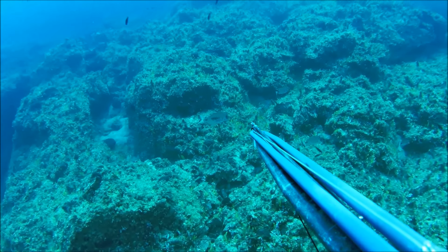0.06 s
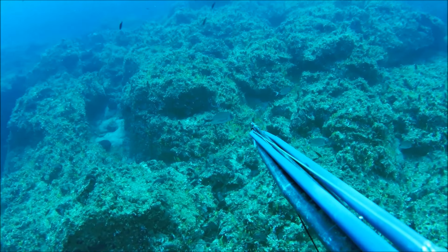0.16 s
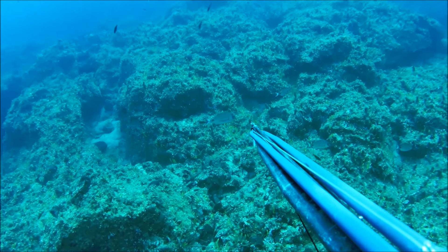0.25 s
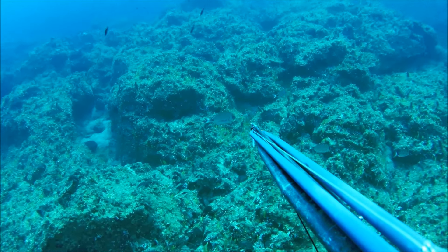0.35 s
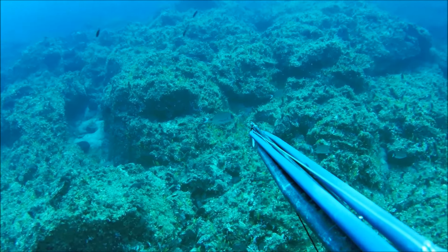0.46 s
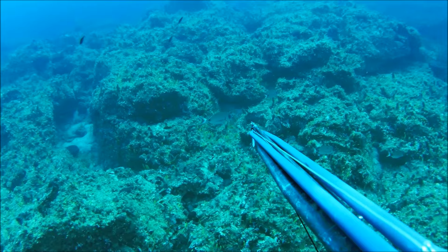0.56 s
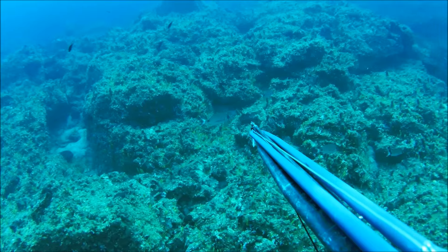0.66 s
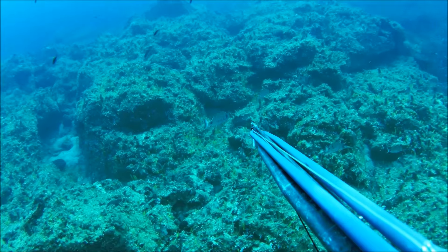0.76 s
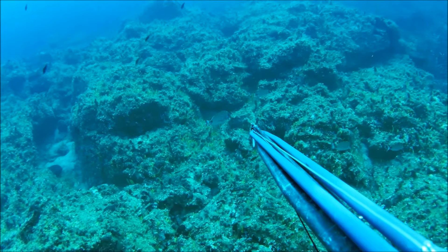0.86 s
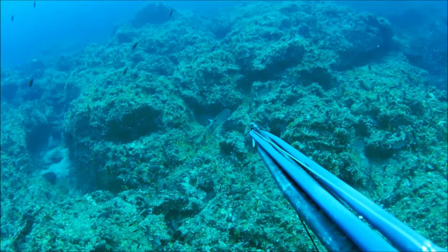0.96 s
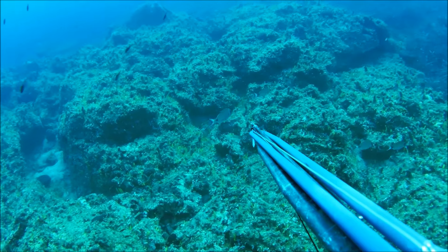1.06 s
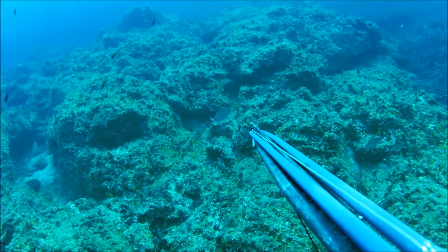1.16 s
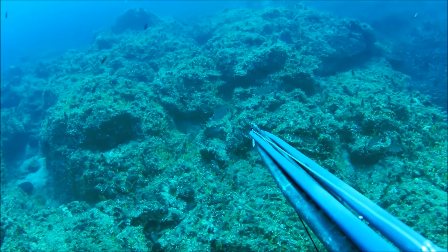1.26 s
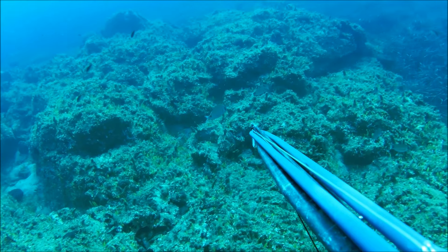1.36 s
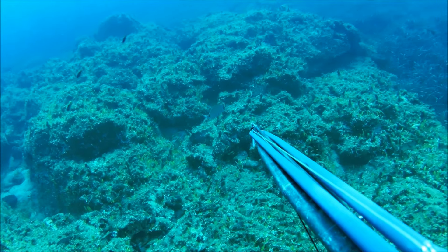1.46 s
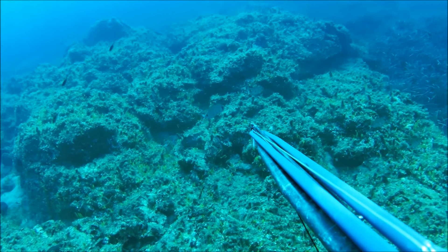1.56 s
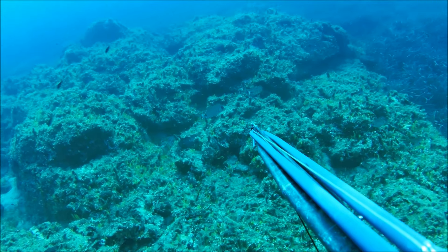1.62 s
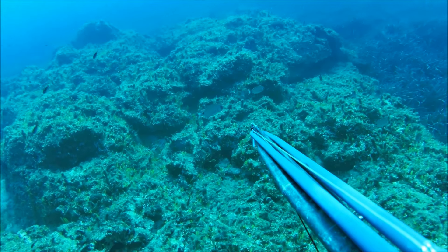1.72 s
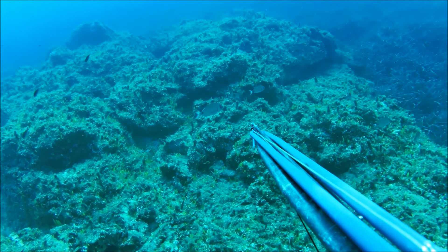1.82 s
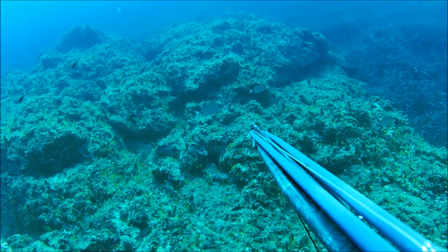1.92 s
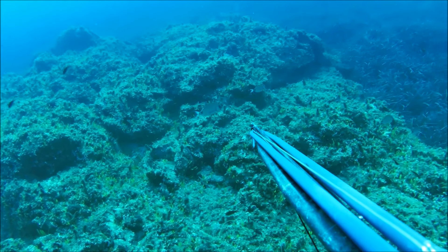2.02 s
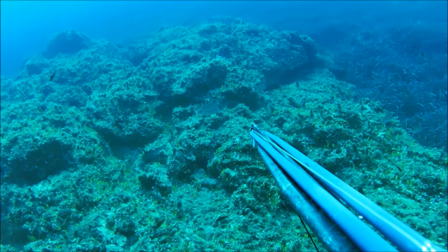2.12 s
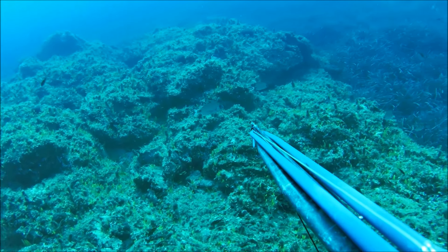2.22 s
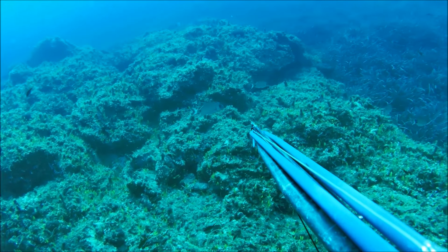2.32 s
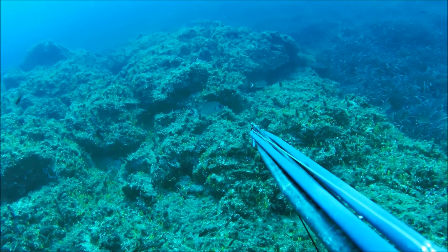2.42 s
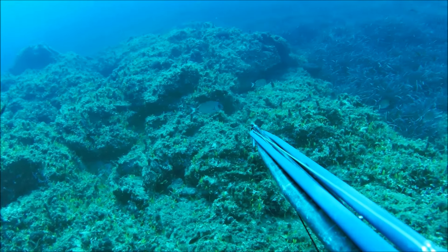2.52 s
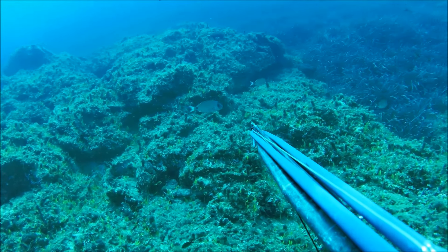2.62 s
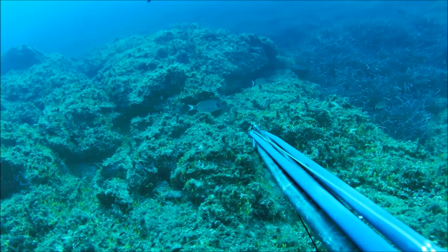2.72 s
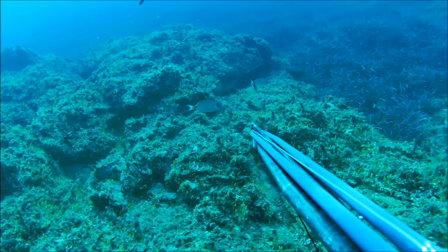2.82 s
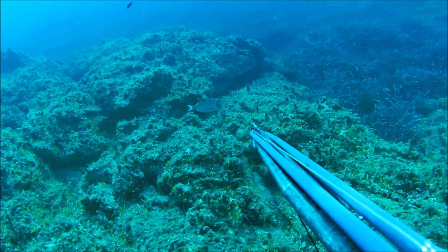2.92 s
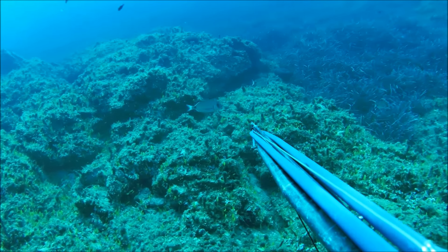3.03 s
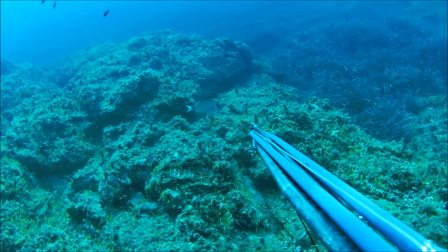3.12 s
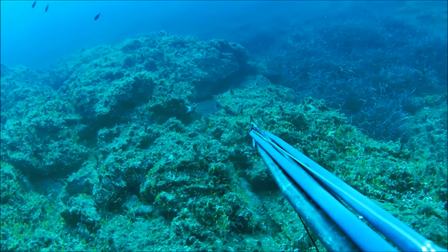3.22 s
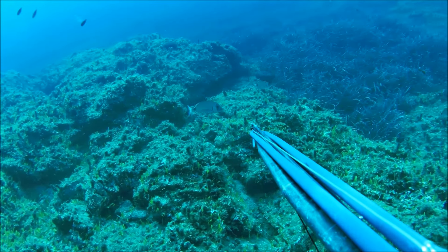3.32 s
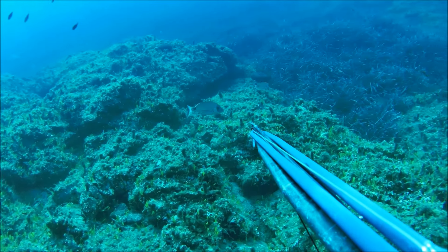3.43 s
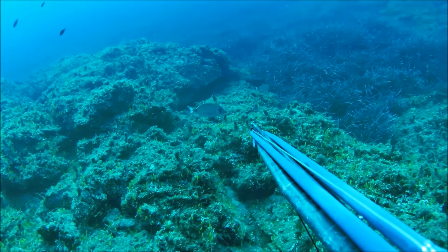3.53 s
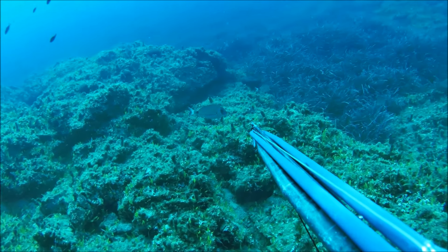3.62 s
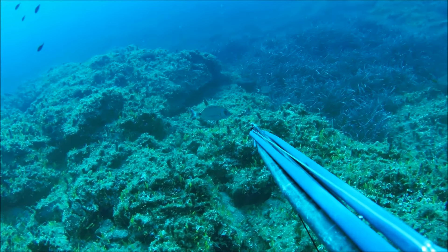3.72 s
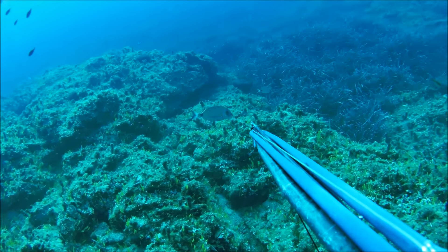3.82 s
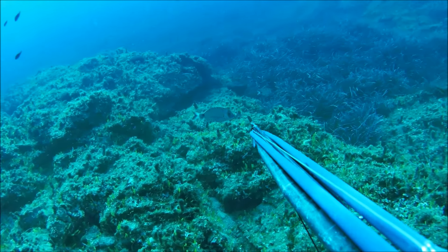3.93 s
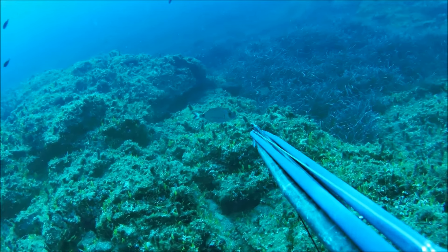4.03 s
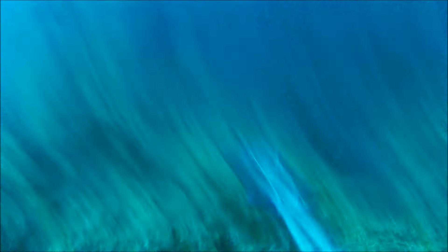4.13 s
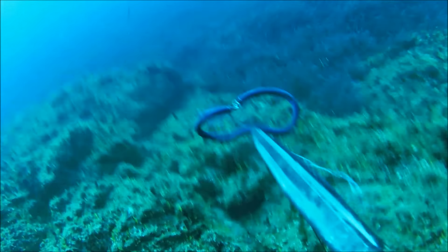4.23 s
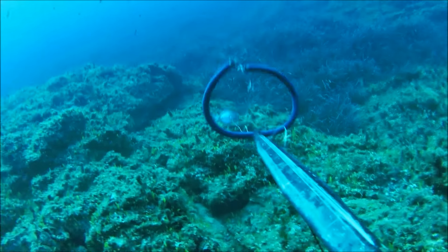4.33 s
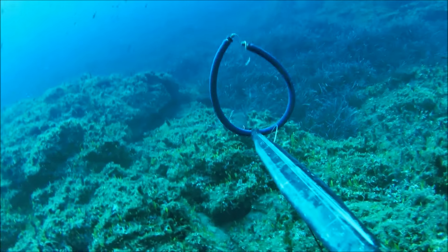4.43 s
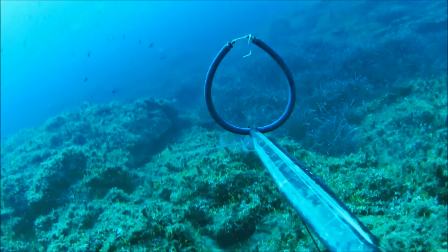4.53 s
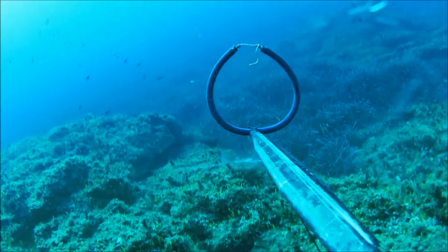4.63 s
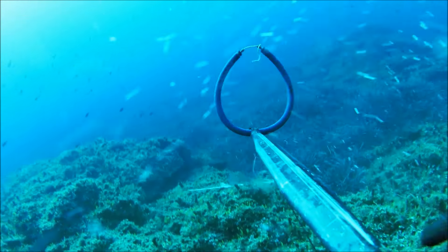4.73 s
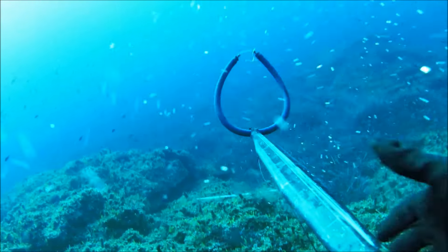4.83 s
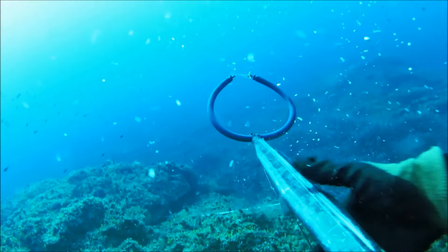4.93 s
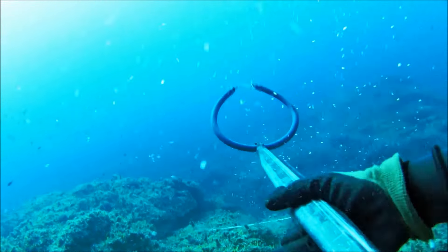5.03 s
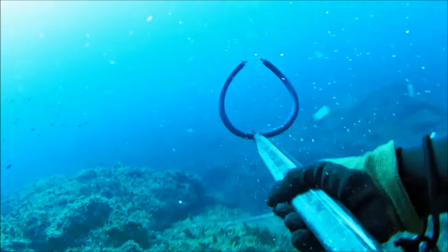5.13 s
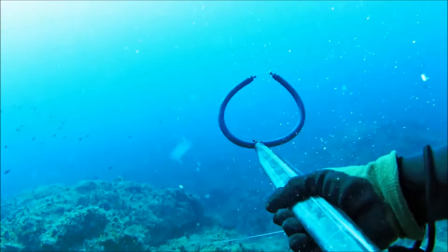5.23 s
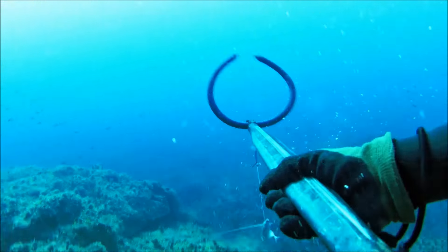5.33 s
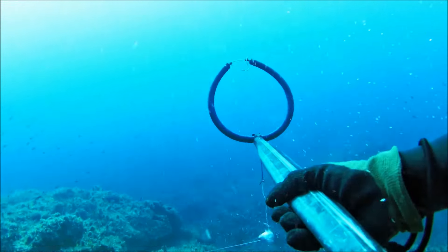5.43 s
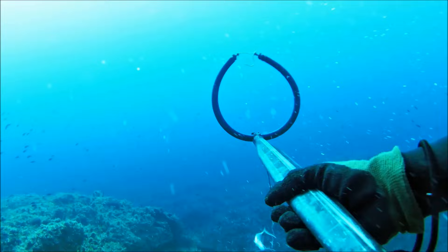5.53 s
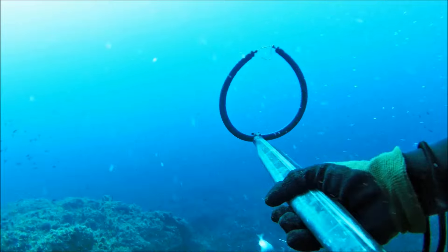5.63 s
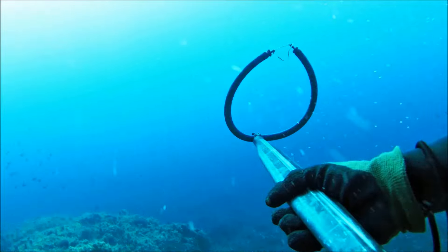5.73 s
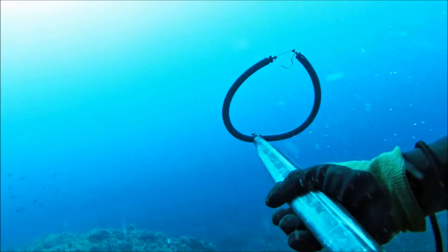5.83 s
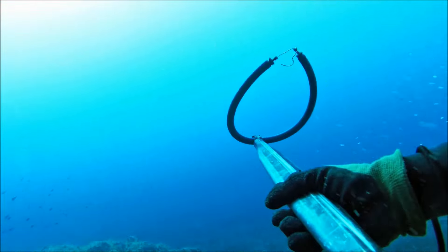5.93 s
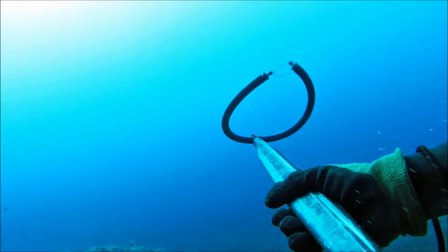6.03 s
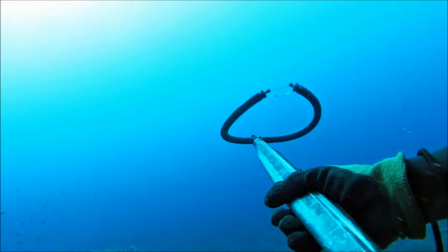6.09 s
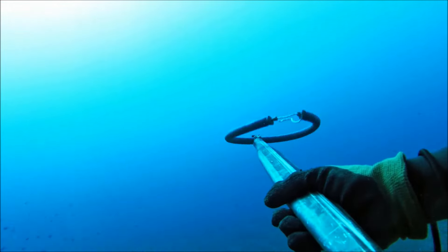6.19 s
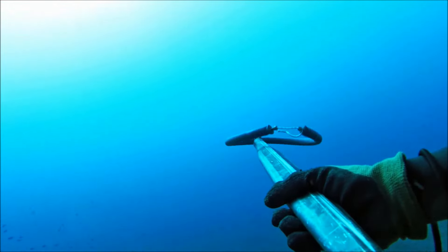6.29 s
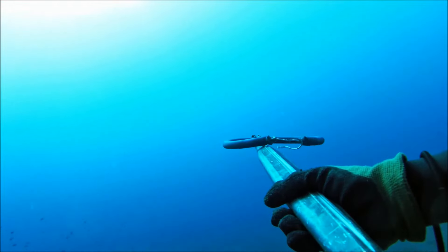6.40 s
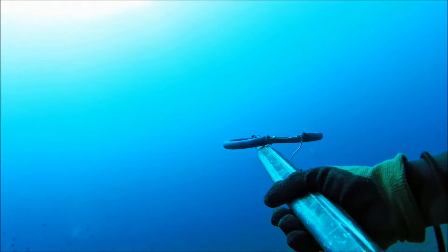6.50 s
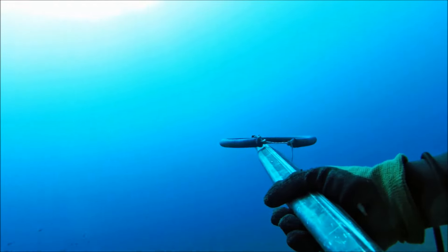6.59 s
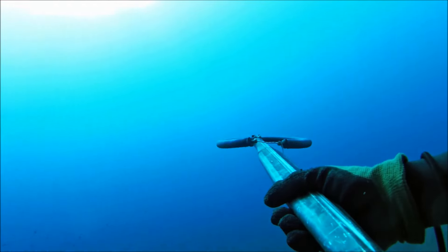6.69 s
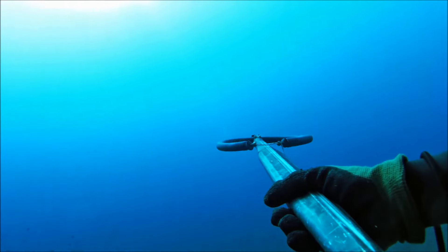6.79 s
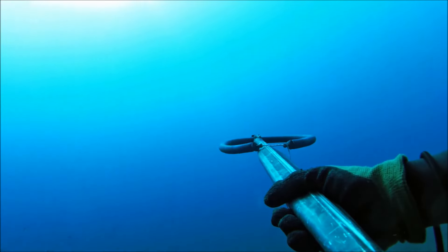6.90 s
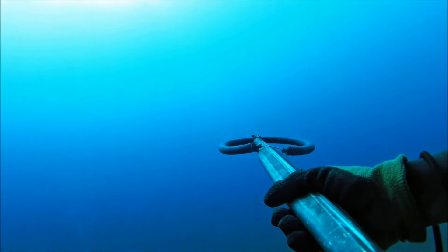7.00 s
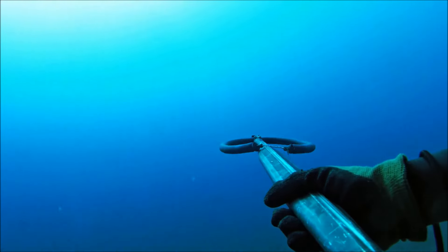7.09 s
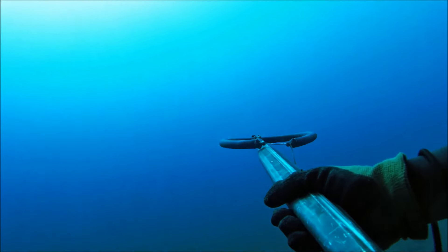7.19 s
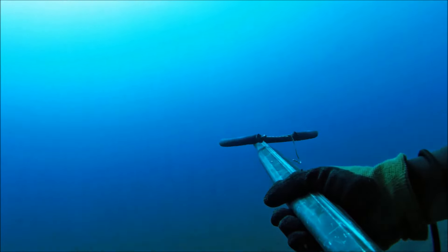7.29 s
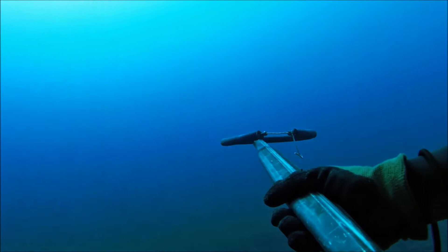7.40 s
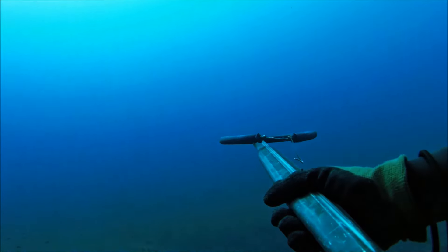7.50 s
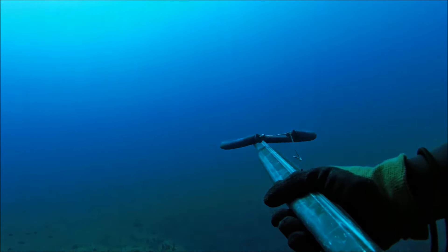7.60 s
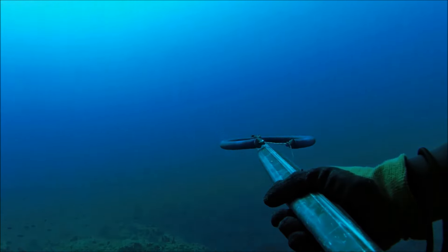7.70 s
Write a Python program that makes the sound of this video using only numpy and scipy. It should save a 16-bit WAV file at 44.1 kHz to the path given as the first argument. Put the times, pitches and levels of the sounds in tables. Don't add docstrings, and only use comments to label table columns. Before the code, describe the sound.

Under the sea, faint crackling calm is shattered by an overloaded speargun blast; handling knocks and line scrapes follow, then settle back to hiss.

```python
import sys
import numpy as np
from scipy import signal
from scipy.fft import rfft, irfft
from scipy.io import wavfile

SR = 44100
rng = np.random.default_rng(int(sys.argv[2]) if len(sys.argv) > 2 else 0)


def to_linear_factor(level_db):
    exponent = np.asarray(level_db, float) / 20
    return 10 ** exponent


def master_out(mix):
    frames = np.transpose(np.atleast_2d(mix))
    ceiling = np.clip(frames, -1, 1)
    pcm = np.round(ceiling * 32767).astype(np.int16)
    wavfile.write(sys.argv[1], SR, pcm)


N = 341775
TIME_S = np.arange(N) / SR
LOOSE_S = 4.44

# f/Hz, width/Hz, level/dB
HOUSING_MODES = [(43, 25, 2.5), (73.6, 20, -2), (160.8, 10, -1), (200, 99, -1), (260, 20.2, 5.5),
                 (315.6, 41.5, 1), (433, 78, -1), (489.6, 49, -1.5), (807.6, 95, -1.5), (1022.5, 167, -1),
                 (1175, 86, -7), (1550, 88, -12), (2040, 890, -17), (2256, 140, -12.5), (4700, 570, -31)]
# f/Hz, density/dB per Hz
LEAK = [(20, -43), (100, -14.5), (400, -26.5), (620, -32.5), (1400, -30), (3000, -29.5), (5500, -33.5),
        (8000, -38.5), (11000, -69.5), (16000, -75)]
# t/s, level/dB
SEA_LEVEL = [
    (0.0, -44.5),
    (4.3, -45),
    (4.46, -57),
    (4.6, -52),
    (4.7, -42),
    (5.5, -47),
    (5.62, -49.5),
    (5.74, -46.5),
    (7.75, -47),
]
# f/Hz, level/dB
CAMERA_HUM = [(299, -57), (441, -59), (500, -66.5), (567, -66.5), (1200, -65.5), (1776, -90.5)]
# t/s, peak/dB
SHRIMP_SNAPS = [(0.1889, -47), (0.848, -46), (1.056, -47), (1.251, -37), (1.4162, -48), (1.7943, -47),
                (1.848, -39.5), (1.878, -41), (2.1566, -35.5), (2.209, -44), (2.539, -41), (2.602, -44),
                (2.78, -41.5), (2.855, -45), (2.9057, -43), (3.174, -40), (3.29, -38), (3.4185, -42),
                (3.99, -42), (6.4404, -45), (6.6484, -41), (6.998, -21.5), (7.595, -29), (7.74, -44)]
# t/s, peak/dB, f/Hz, rise/s, hold/s, t60/s
SLOW_HEAVES = [
    (0.2, -49, 48, .15, 0, .8),
    (3.97, -40, 50, .15, 0, .6),
    (4.66, -31, 45, .05, .06, .4),
    (6.9, -33, 48, .05, .04, .4),
    (5.6008, -7.5, 185, .0015, .004, .06),
    (5.408, -17, 186, .02, .04, .12),
    (5.263, -6, 225, .002, 0, .09),
    (5.8, -33, 185, .04, .06, .2),
    (7.36, -33, 185, .04, .05, .2),
]
# t/s, peak/dB
LID_RAPS = [(0.474, -32), (0.495, -27), (0.508, -26), (0.528, -35), (0.544, -37), (4.244, -27.5),
            (4.263, -22), (4.486, -24), (4.874, -20.5), (4.892, -28), (4.947, -8), (4.958, -24),
            (4.983, -19.5), (5.009, -24), (5.036, -19.5), (5.139, -20), (5.198, -8), (5.293, -21.5),
            (5.424, -25.5), (5.677, -29), (5.716, -22.5), (5.793, -30), (5.853, -22.5), (5.889, -35),
            (6.127, -20.5), (6.147, -13), (6.225, -15), (6.582, -27.5), (6.734, -34.5), (7.185, -36.5)]
# t/s, peak/dB, brightness/dB
LID_CLACKS = [(0.239, -34, -30), (0.263, -33.5, -38), (4.457, -10, -16), (4.536, -13.5, -37),
              (4.59, -30, -9), (4.707, -17, -5.5), (4.737, -19, -26), (4.849, -16, -3.5), (4.923, -35, 0.5),
              (5.075, -21.5, -7), (5.162, -15.5, -24), (5.217, 3, -9), (5.237, -11, -14), (5.259, -4.5, 0),
              (5.352, -18.5, -34), (5.372, -16, -37), (5.395, -10.5, -22), (5.479, -29, -2),
              (5.594, -13, -10), (5.647, -22, -24), (6.238, -13, -18), (7.052, -27.5, -31)]
# t/s, peak/dB, f/Hz
MOUNT_SWINGS = [(0.259, -42, 433), (0.507, -22, 168.3), (0.547, -27, 166.4), (0.591, -33.5, 164),
                (0.785, -34.5, 262), (3.93, -44, 52), (4.259, -17, 293), (4.52, -32, 282),
                (4.903, -19, 250), (4.965, -12.5, 274.6), (4.993, -15, 349), (5.367, -22, 300),
                (5.47, -23.5, 187.5), (5.638, -20.5, 309.5), (5.711, -25, 301), (5.869, -31, 340),
                (6.108, -16.5, 177), (6.128, -19, 187), (6.588, -16.5, 334.5), (6.821, -45, 241)]
# t/s, peak/dB, f/Hz
SWIVEL_TAPS = [(.499, -22, 990), (0.509, -22, 1015), (0.53, -34, 1010), (.546, -34, 950),
               (1.068, -49, 4500), (1.263, -42, 4700), (1.54, -52, 4800), (1.66, -51, 4620),
               (1.786, -54, 4400), (4.018, -49, 4500), (4.246, -28, 400), (4.885, -41, 2000),
               (4.919, -40.5, 2400), (4.964, -30, 2100), (5.009, -46, 2000), (5.038, -46, 2100),
               (5.051, -41, 2100), (5.064, -46, 2000), (5.136, -42, 1510), (5.165, -42.5, 1500),
               (5.198, -25, 2030), (5.208, -40, 2200), (5.229, -32, 1900), (5.335, -45, 2000),
               (5.464, -36, 1500), (5.474, -41, 2100), (5.484, -34, 2040), (5.494, -37, 1500),
               (5.94, -45, 2250), (5.97, -55, 3100), (6.053, -43, 2300), (6.065, -45, 2290),
               (6.165, -40, 2030), (6.22, -51, 3200), (6.24, -25.5, 2250), (6.261, -53, 4700),
               (7.021, -56, 5200), (7.042, -47, 2300)]
# t/s, peak/dB, f/Hz, rise/s, t60/s
WATER_PUSHES = [
    (0.501, -39.5, 79.3, 0.027, 0.5),
    (2.05, -38, 147, 0.011, 0.12),
    (4.301, -4, 61.9, 0.028, 0.45),
]
# t/s, peak/dB, f/Hz
GLOVE_BUMPS = [(0.791, -34, 256), (5.396, -29, 260), (5.47, -24, 185), (5.62, -26, 190), (5.941, -43, 190),
               (6.086, -16, 232), (6.759, -24, 226), (6.87, -27, 74.6), (6.969, -49, 230),
               (7.049, -36, 292), (7.31, -27.5, 70), (7.335, -30, 191), (7.459, -42, 70)]
# t/s, peak/dB, f/Hz
GRIP_THUMPS = [(2.056, -23, 251), (3.03, -45, 250), (4.446, -24, 73.4), (4.683, -33, 277),
               (4.947, -3.5, 307.6), (5.056, -13.5, 260), (5.199, -5, 328), (5.215, -5, 294),
               (5.247, 4.5, 269), (5.277, -9.5, 188), (5.312, -14.5, 298), (5.352, -11.5, 220),
               (5.625, -25, 200), (5.676, -30.5, 295), (6.043, -20, 65.6), (6.377, -34, 260),
               (6.598, -11, 128.4), (6.617, -12, 78), (6.693, -28.5, 138), (6.738, -27.5, 360),
               (6.816, -23, 67), (7.094, -23.5, 105), (7.172, -28.5, 53.5), (7.236, -20.5, 259),
               (7.578, -38, 436)]
# t/s, peak/dB, f/Hz, shaking/s
NOTCH_CHATTER = [
    (4.286, -24, 950, 0.0066),
    (4.437, -13.5, 1033, 0.0067),
    (4.523, -23, 950, 0.0018),
    (4.957, -11, 991, 0.0097),
    (5.145, -28, 970, 0.0027),
    (5.233, -15, 1020, 0.0091),
    (5.424, -23.5, 1000, .004),
    (6.146, -16.5, 940, 0.0057),
    (6.158, -20.5, 892, 0.01),
    (6.218, -22, 1012, 0.017),
]
# t/s, peak/dB, f/Hz
LINE_FLICKS = [(4.498, -47, 4600), (4.523, -47, 2200), (4.589, -51, 3600), (4.595, -50, 3400),
               (4.657, -51, 4600), (4.292, -30, 2100), (4.947, -36, 2300), (4.953, -35, 2300),
               (5.253, -27, 3200), (5.338, -52, 3000), (5.396, -47, 2400), (5.458, -46, 3000),
               (5.5375, -32, 7000), (5.597, -35, 6500), (5.679, -34, 900), (6.055, -51, 3200),
               (6.178, -47, 3400), (6.191, -46, 4300), (6.26, -46, 3030), (6.998, -32, 2420),
               (7.596, -28, 2600)]
# t/s, level/dB, f/Hz, shaking/s
SHAFT_RATTLES = [(4.293, -17, 870, .002), (4.297, 7, 1047, .004), (4.3035, 10, 830, .003),
                 (4.3105, 4, 1050, .005), (4.3215, 7, 850, .008), (4.335, 6, 1000, .003),
                 (4.341, 7, 900, .005), (4.359, -5, 850, .004), (4.4, 7, 1030, .0035),
                 (4.408, 4, 950, .004), (4.421, 2, 910, .003), (4.428, -16, 900, .004),
                 (4.432, -20, 1000, .003), (5.534, -6.5, 930, .005), (5.543, -13, 1015, .004),
                 (5.553, -13, 950, .004)]
# t/s, level/dB, f/Hz, shaking/s
BAND_WHIPS = [
    (4.3025, 7, 130, .006),
    (4.3135, 3, 260, .003),
    (4.3185, 6, 150, .013),
    (4.339, 6, 338, .006),
    (4.349, 12, 325, .008),
    (4.364, 2, 230, .002),
    (4.3705, 11, 275, .021),
    (4.392, 10, 190, .006),
    (4.413, 0.5, 323, .0013),
]
# t/s, peak/dB, centre/Hz, rise/s, t60/s
LINE_DRAGS = [
    (4.428, -28, 2600, 0.01, 0.012),
    (4.833, -29, 3570, 0.0182, 0.044),
    (5.532, -17, 2440, 0.0093, 0.046),
    (5.569, -37, 2920, .014, 0.028),
]
# start/s, length/s, force/dB, reach to lid/dB
RUB_STROKES = [(4.439, 0.075, -22.5, -14), (4.617, 0.029, -40, -2.5), (4.741, 0.076, -35.5, -4),
               (4.944, 0.021, -15, -12), (5.039, 0.18, -31.5, -8.5), (5.245, 0.019, -18.5, -2.5),
               (5.342, 0.09, -20.5, -16.5), (5.478, 0.086, -19, -6.5), (5.642, 0.033, -31.5, -11.5),
               (5.795, 0.089, -31.5, -0.5), (5.931, 0.014, -36, -1.5), (5.984, 0.051, -31.5, -8),
               (6.076, 0.055, -18.5, -14), (6.143, 0.078, -22, -3.5), (6.199, 0.041, -18.5, -8),
               (6.602, 0.057, -50, 6), (6.78, .05, -58, 7), (7.059, 0.03, -43, -10),
               (7.3, 0.13, -37.5, -10)]
# t/s, grip/dB
GLOVE_GRIP = [
    (6.252, 0),
    (6.27, -14),
    (6.3, -8),
    (6.36, 0),
]
# t/s, level/dB
WATER_SURGES = [(4.44, -17), (4.55, -33), (4.66, -34), (4.8, -38), (4.911, -29.5), (5.02, -24.5),
                (5.13, -27.5), (5.26, -16), (5.41, -24), (5.55, -22), (5.69, -36), (5.84, -32.5),
                (6.06, -29), (6.18, -26), (6.641, -22), (6.8, -25.5), (6.96, -47), (7.15, -31.5),
                (7.43, -31.5)]
# t/s, length/s, level/dB
LINE_SCRAPES = [(4.444, 0.0088, -78), (4.699, 0.03, -59), (4.823, .03, -61), (4.937, 0.025, -67.5),
                (5.23, 0.027, -57.5), (5.47, .02, -62.5), (5.535, 0.015, -65), (5.807, 0.016, -56.5),
                (6.045, 0.026, -66), (6.168, 0.063, -59.5), (6.917, .02, -70), (7.22, .02, -72),
                (7.352, .02, -73), (7.7, 0.036, -77)]
# t/s, peak/dB, housing knock re peak/dB
LINE_TICKS = [(4.4573, -47, 0), (4.55, -44.5, -4), (4.7073, -18.5, -17), (4.761, -48, 4),
              (4.8484, -21.5, 2), (4.865, -34, -5), (4.947, -48.5, 17.5), (4.956, -51, 12.5),
              (5.43, -41, -9), (5.491, -38, 3), (5.792, -37.5, 2), (6.2402, -28, -13)]
# t/s, peak/dB, f/Hz
BUBBLE_FIZZ = [
    (4.462, -50, 4400),
    (4.9, -44, 2110),
    (5.029, -49, 2000),
    (5.13, -52, 2390),
    (5.27, -49, 1980),
    (5.46, -38, 2000),
    (6.14, -55, 4480),
    (6.18, -55, 4500),
    (6.17, -55, 3250),
]
# t/s, peak/dB, f/Hz
HAND_KNOCKS = [
    (4.482, -9, 315),
    (4.511, -7.5, 285),
    (4.534, -15, 230),
    (4.732, -19.5, 270),
    (4.891, -8, 187),
    (5.348, -2.5, 224),
    (5.37, -10, 285),
    (5.592, 2, 206.7),
    (5.678, -23.5, 399),
]
# t/s, peak/dB, f/Hz
MOUNT_ROCKS = [
    (5.045, -6, 299),
    (6.071, -16, 226),
    (6.764, -18, 200),
    (7.35, -23, 199.5),
    (7.39, -21, 250),
]
# t/s, level/dB, f/Hz, shaking/s
BUTT_SLAM = [
    (5.5085, 10, 283, .022),
    (5.5152, 7, 1100, .0003),
]
# t/s, level/dB, f/Hz, t60/s
SHAFT_CLINKS = [
    (5.733, -54, 4250, .08),
    (5.794, -43, 4240, .15),
    (5.79, -50, 2300, .08),
    (5.79, -56, 3050, .08),
]


def evened(x):
    return x / np.sqrt(np.mean(x ** 2) + 1e-20)


def peaked(x):
    return x / abs(x).max()


def add(mix, start_s, sound):
    part = mix[round(start_s * SR):][:len(sound)]
    part += sound[:len(part)]


def band(x, lo_hz, hi_hz):
    return signal.sosfilt(signal.butter(2, [lo_hz, hi_hz], "band", fs=SR, output="sos"), x)


def envelope(rise_s, hold_s, t60_s):
    t = np.arange(round((rise_s + hold_s + t60_s) * SR)) / SR
    attack = np.sin(np.pi / 2 * np.clip(t / rise_s, 0, 1)) ** 2
    return t, attack * to_linear_factor(-60 * np.maximum(t - rise_s - hold_s, 0) / t60_s)


def push(rise_s, t60_s):
    shape = envelope(rise_s, 0, t60_s)[1][:4000]
    return rng.standard_normal(4000) * np.pad(shape, (0, 4000 - len(shape)))


def puff(hz, width, rise_s, t60_s):
    edges_hz = hz / width, min(hz * width, SR / 2.2)
    return peaked(band(band(push(rise_s, t60_s), *edges_hz), *edges_hz))


def ring(hz, rise_s, hold_s, t60_s, wobble=0.0055, pair_db=-7, jitter=0.):
    t, shape = envelope(rise_s, hold_s, t60_s)
    chance, stumble = rng.random(), rng.standard_normal(400)
    turns = hz * t * (1 + wobble * np.exp(-t / 0.0072))
    turns = turns + jitter * np.interp(turns, np.arange(len(stumble)), stumble - stumble[0])
    neighbour = to_linear_factor(pair_db) * np.sin(2 * np.pi * turns * (0.716 + 0.587 * chance))
    return -shape * (neighbour + np.sin(2 * np.pi * turns))


def grains(per_s, spread_db):
    size = to_linear_factor(spread_db * np.minimum(rng.exponential(1, N), 5)) * rng.choice([-1., 1.], N)
    return evened(size * (rng.random(N) < per_s / SR))


def lumps(per_s, depth_db):
    knots = rng.standard_normal(2000)
    return to_linear_factor(depth_db * np.interp(TIME_S * per_s, np.arange(len(knots)), knots))


def swell(start_s, length_s, db, rise_db_per_s, fall_db_per_s, rest_db):
    start_s, length_s, db = (np.reshape(v, (-1, 1)) for v in (start_s, length_s, db))
    t = TIME_S[::64]
    climb_db = rise_db_per_s * np.maximum(start_s - t, 0)
    fall_db = fall_db_per_s * np.maximum(t - start_s - length_s, 0)
    strokes_db = (db - climb_db - fall_db).max(axis=0)
    fade_in = np.clip((TIME_S - LOOSE_S) / 0.033 + 1, 0, 1)
    return fade_in * to_linear_factor(np.interp(TIME_S, t, np.maximum(strokes_db, rest_db)))


def housing(x, lo_hz, hi_hz):
    out = np.zeros(len(x))
    for k, (hz, width_hz, db) in enumerate(HOUSING_MODES):
        if lo_hz < hz < hi_hz:
            out += (-1) ** k * to_linear_factor(db) * signal.lfilter(*signal.iirpeak(hz, hz / width_hz, SR), x)
    return out


def snaps(events, rise_s, t60_s, lag_s):
    mix = np.zeros(N)
    for s, db, hz, knock_db in events:
        snap = puff(hz, 1.62, rise_s, t60_s)
        knock = puff(2240, 1.34, rise_s, 3 * t60_s)
        add(mix, s + lag_s, to_linear_factor(db) * (snap + to_linear_factor(knock_db) * knock))
    return mix


def thumps(events):
    mix = np.zeros(N)
    for s, db, hz, rise_s, t60_s in events:
        mount = peaked(band(housing(push(rise_s, t60_s), 100, 600), 60, 320))
        add(mix, s, to_linear_factor(db) * ring(hz, rise_s, 0, t60_s, wobble=0.13, jitter=0.0064))
        add(mix, s, to_linear_factor(db - 8.5) * mount)
    return mix


def jolts(events, rise_s, t60_s):
    mix = np.zeros(N)
    for s, db, hz, hold_s in events:
        add(mix, s, to_linear_factor(db) * ring(hz, rise_s, hold_s, t60_s, pair_db=-8, jitter=.1))
        add(mix, s, to_linear_factor(db - 33.5) * puff(1800, 2.0, rise_s + hold_s, 4.0 * t60_s))
        add(mix, s, to_linear_factor(db - 17.0) * puff(576, 3.0, rise_s + hold_s, 4.5 * t60_s))
    return mix


def sea():
    water = rng.standard_normal(N) * lumps(11.0, 0.89) + to_linear_factor(-20.5) * grains(380, 6.5)
    leak_hz, leak_db = np.transpose(LEAK)
    f_hz = np.fft.rfftfreq(N, 1 / SR)
    power = to_linear_factor(2 * np.interp(np.log(f_hz + 1), np.log(leak_hz), leak_db))
    for centre_hz, width_hz, db in HOUSING_MODES:
        power += to_linear_factor(2 * db) / (1 + ((f_hz - centre_hz) / width_hz) ** 2 * 2) ** 2
    hiss = to_linear_factor(np.interp(TIME_S, *np.transpose(SEA_LEVEL))) * evened(irfft(rfft(water) * np.sqrt(power), N))
    echoes = rng.standard_normal(400) * to_linear_factor(-60 * np.arange(400) / SR / 0.011)
    far = signal.oaconvolve(abs(grains(200, 3.6)), abs(echoes))[:N] * water[::-1]
    crackle = to_linear_factor(-71.5) * evened(band(band(far, 3800, 6000), 3800, 6000))
    hum = sum(to_linear_factor(db) * np.sin(2 * np.pi * hz * TIME_S) * lumps(1.7, 0.9) for hz, db in CAMERA_HUM)
    return hiss + crackle + hum


def shrimp():
    events = [(s, db, 4450 * (1 + .07 * rng.standard_normal()), -9) for s, db in SHRIMP_SNAPS]
    return snaps(events, rise_s=.0003, t60_s=.005, lag_s=.0012)


def heaves():
    mix = np.zeros(N)
    for s, db, hz, rise_s, hold_s, t60_s in SLOW_HEAVES:
        add(mix, s, to_linear_factor(db) * ring(hz, rise_s, hold_s, t60_s, pair_db=-18, jitter=.02))
    return mix


def lid_hits():
    mix = np.zeros(N)
    raps = [(s, db, -24.5, 0.079) for s, db in LID_RAPS]
    clacks = [(*row, 0.0084) for row in LID_CLACKS]
    for s, db, bright_db, t60_s in raps + clacks:
        lid = peaked(band(housing(push(0.0018, t60_s), 700, 1300), 804, 1080))
        add(mix, s - .002, to_linear_factor(db) * lid)
        add(mix, s - .002, to_linear_factor(db + bright_db) * puff(1610, 1.52, 0.0038, t60_s))
    return mix


def mount_swings():
    return thumps([(*row, 0.0057, 0.16) for row in MOUNT_SWINGS])


def swivel_taps():
    mix = np.zeros(N)
    for s, db, hz in SWIVEL_TAPS:
        add(mix, s - .001, to_linear_factor(db) * puff(hz, 1.17, .002, 0.012))
    return mix


def water_pushes():
    return thumps(WATER_PUSHES)


def glove_bumps():
    mix = np.zeros(N)
    for s, db, hz in GLOVE_BUMPS:
        add(mix, s, to_linear_factor(db) * ring(hz, 0.01, 0, 0.09, wobble=.05, pair_db=-9.5, jitter=0.029))
    return mix


def grip_thumps():
    return thumps([(*row, 0.0064, 0.055) for row in GRIP_THUMPS])


def notch_chatter():
    mix = np.zeros(N)
    for s, db, hz, hold_s in NOTCH_CHATTER:
        add(mix, s, to_linear_factor(db) * ring(hz, .0015, hold_s, .012, pair_db=-17.5, jitter=0.029))
    return mix


def line_flicks():
    mix = np.zeros(N)
    for s, db, hz in LINE_FLICKS:
        add(mix, s, to_linear_factor(db) * puff(hz, 1.53, 0.0015, 0.0054))
    return mix


def shaft_rattles():
    return jolts(SHAFT_RATTLES, rise_s=.0008, t60_s=.008)


def band_whips():
    return jolts(BAND_WHIPS, rise_s=.0012, t60_s=.008)


def line_drags():
    mix = np.zeros(N)
    for s, db, hz, rise_s, t60_s in LINE_DRAGS:
        add(mix, s, to_linear_factor(db) * puff(hz, 2.07, rise_s, t60_s))
    return mix


def rubbing():
    start_s, length_s, force_db, reach_db = np.transpose(RUB_STROKES)
    grip = to_linear_factor(np.interp(TIME_S, *np.transpose(GLOVE_GRIP)))
    mount = grip * swell(start_s, length_s, force_db, 254, 447, rest_db=-53)
    lid = grip * swell(start_s, length_s, force_db + reach_db, 254, 447, rest_db=-47.5)
    start_s, db = np.transpose(WATER_SURGES)
    surge = swell(start_s, 0, db, 176.5, 176.5, rest_db=-53)
    start_s, length_s, db = np.transpose(LINE_SCRAPES)
    scrape = swell(start_s, length_s, db, 194.5, 194.5, rest_db=-89.5)

    slips = grains(4000, 4.0) * lumps(60, 2.1)
    water = band(rng.standard_normal(N), 30, 105) * lumps(14, 2.0)
    mount_rub = band(housing(grains(670, 0.44) * lumps(37, 6.9), 100, 600), 160, 391)
    between_rub = band(slips, 330, 670)
    lid_rub = band(band(housing(slips, 700, 1300), 700, 1300), 650, 1350)
    edge_rub = housing(slips, 1400, 5000) + to_linear_factor(-36.0) * slips
    edge_rub = band(band(edge_rub, 1900, 5500), 1900, 5500)

    out = surge * evened(water) + mount * evened(mount_rub)
    out += to_linear_factor(-10.5) * np.sqrt(mount * lid) * evened(between_rub)
    return out + lid * evened(lid_rub) + scrape * evened(edge_rub)


def line_ticks():
    events = [(s, db, 3680, knock_db) for s, db, knock_db in LINE_TICKS]
    return snaps(events, rise_s=0.0025, t60_s=0.0054, lag_s=-0.00039)


def bubble_fizz():
    mix = np.zeros(N)
    for s, db, hz in BUBBLE_FIZZ:
        add(mix, s, to_linear_factor(db) * puff(hz, 1.22, 0.019, .12))
    return mix


def hand_knocks():
    return thumps([(*row, 0.0055, 0.028) for row in HAND_KNOCKS])


def mount_rocks():
    return thumps([(*row, 0.025, 0.08) for row in MOUNT_ROCKS])


def butt_slam():
    return jolts(BUTT_SLAM, rise_s=.0007, t60_s=.009)


def shaft_clinks():
    mix = np.zeros(N)
    for s, db, hz, t60_s in SHAFT_CLINKS:
        add(mix, s, to_linear_factor(db) * ring(hz, 0.0016, 0, t60_s, wobble=0, pair_db=-28))
    return mix


def scene():
    mix = sea() + shrimp() + heaves() + lid_hits() + mount_swings() + swivel_taps()
    mix += water_pushes() + glove_bumps() + grip_thumps()
    mix += notch_chatter() + line_flicks() + shaft_rattles() + band_whips() + line_drags()
    mix += rubbing() + line_ticks() + bubble_fizz() + hand_knocks()
    mix += mount_rocks() + butt_slam() + shaft_clinks()
    return mix[None]


def low_pass(x):
    return signal.sosfilt(signal.butter(12, 15700, fs=SR, output="sos"), x)


def record(dry):
    clipped = np.clip(dry, -.95, .95)
    coupled = signal.lfilter(*signal.butter(1, 55, "high", fs=SR), clipped)
    smooth = signal.lfilter(*signal.butter(2, 5000, fs=SR), coupled)
    hiss = band(rng.standard_normal(dry.shape), 6000, 10500)
    hiss = to_linear_factor(-81) * signal.sosfilt(signal.ellip(6, 1, 40, 12400, fs=SR, output="sos"), hiss)
    edge = signal.firwin(255, 15700, window=("kaiser", 8), fs=SR)
    mix = signal.oaconvolve(np.clip(smooth, -1, 1) + hiss, edge[None], "same")
    return low_pass(mix)


dry = scene()
out = record(dry)
master_out(out)
```